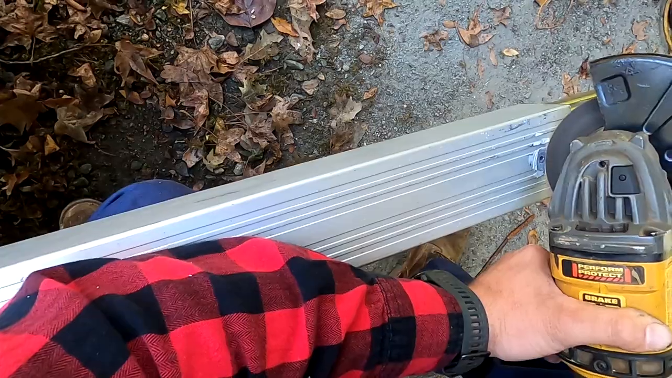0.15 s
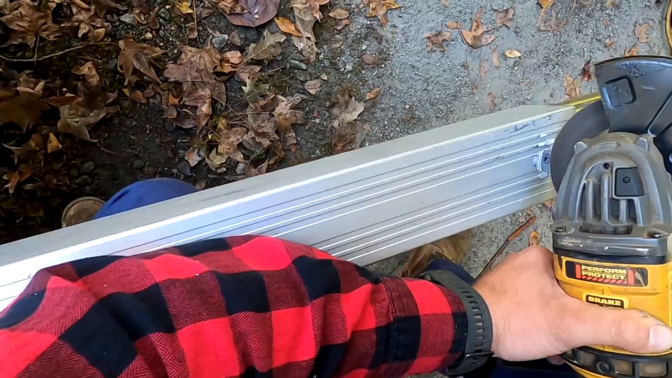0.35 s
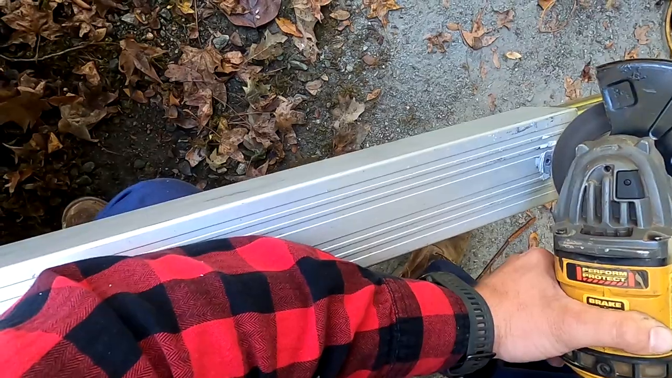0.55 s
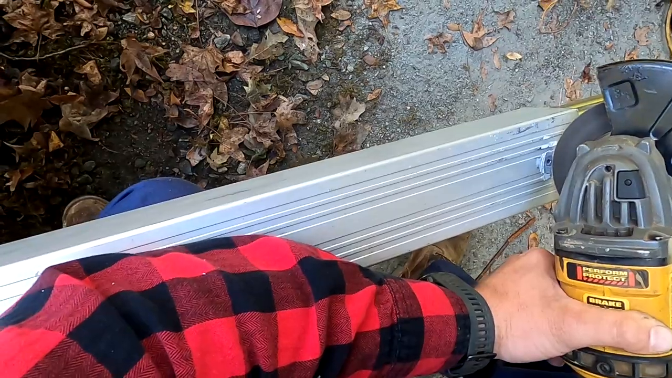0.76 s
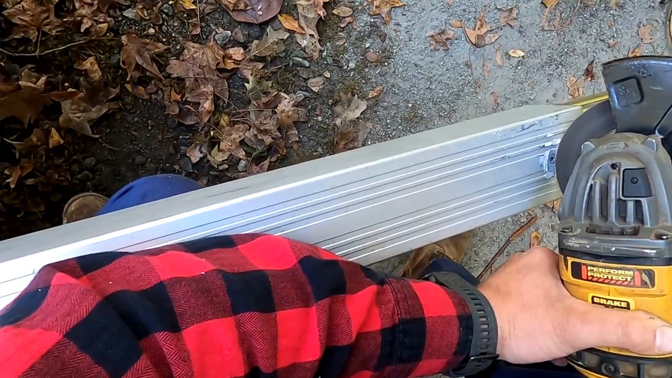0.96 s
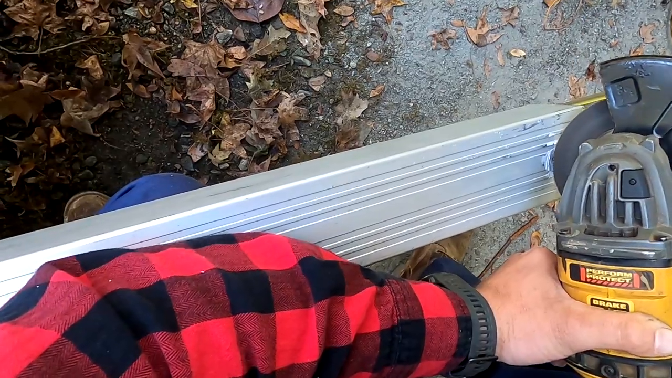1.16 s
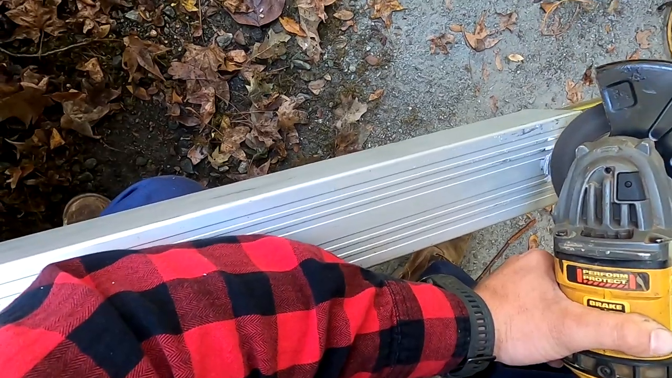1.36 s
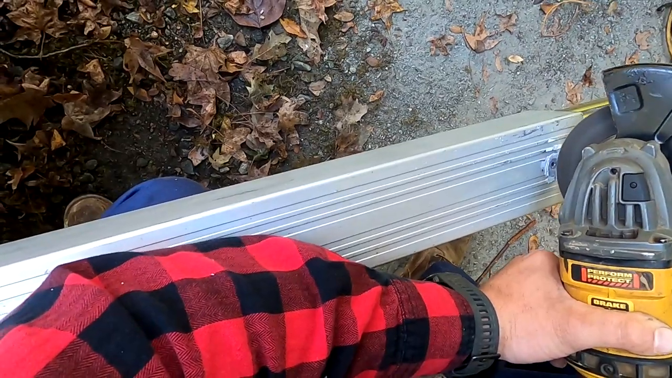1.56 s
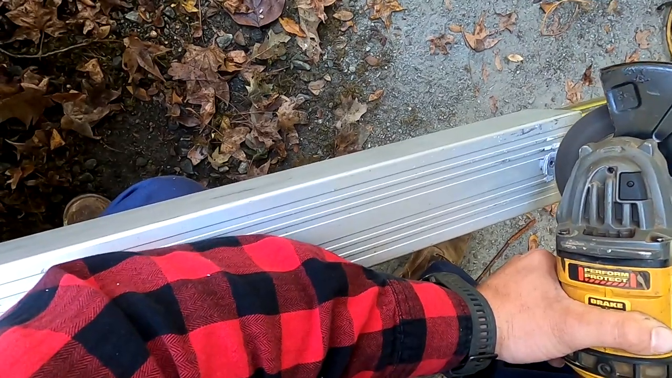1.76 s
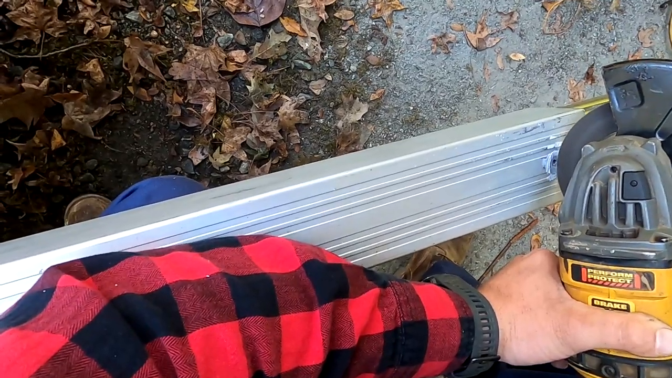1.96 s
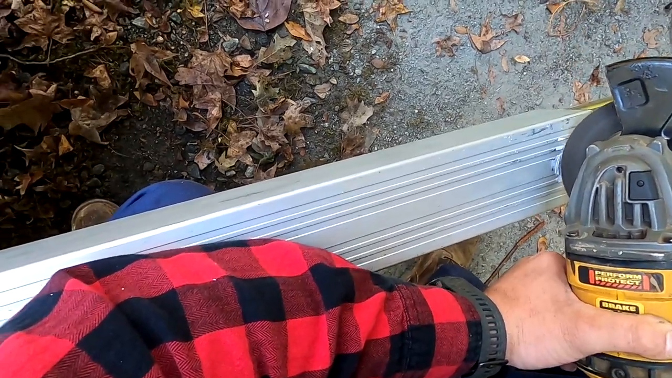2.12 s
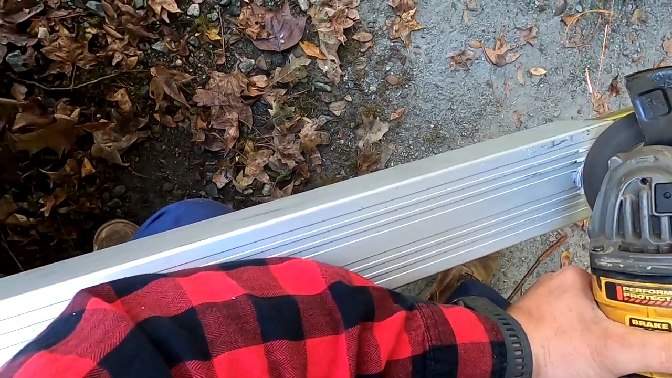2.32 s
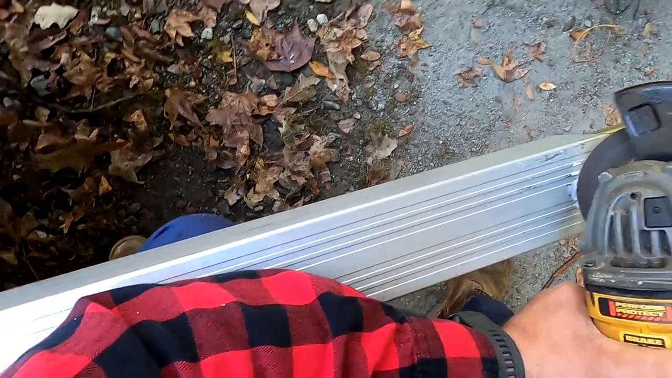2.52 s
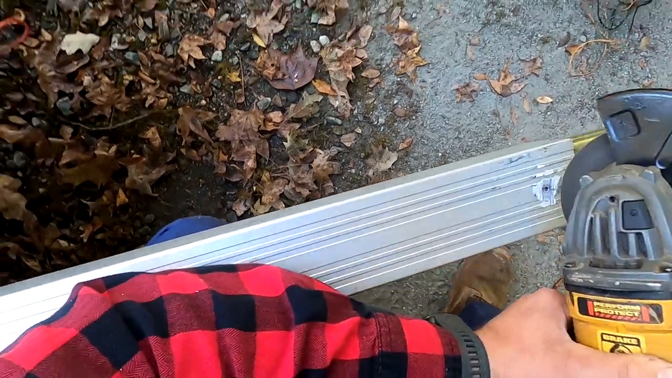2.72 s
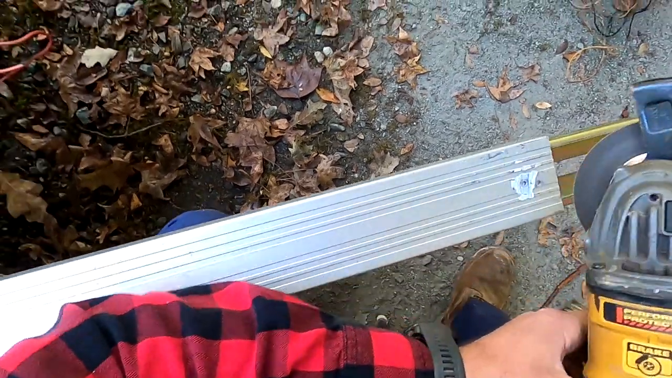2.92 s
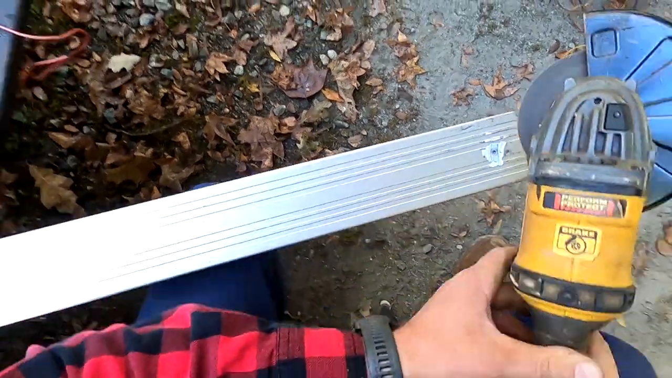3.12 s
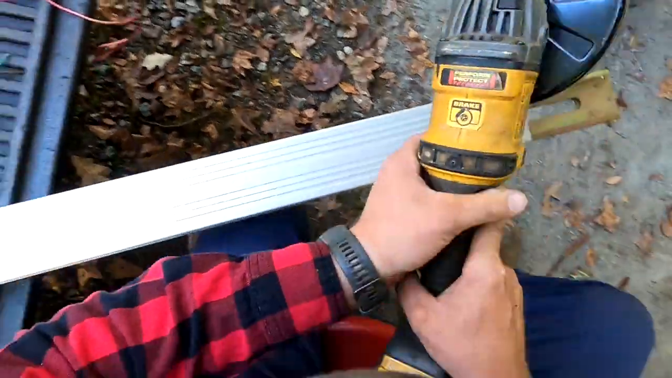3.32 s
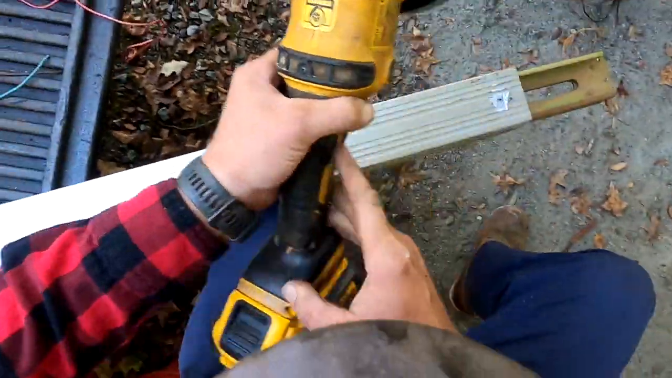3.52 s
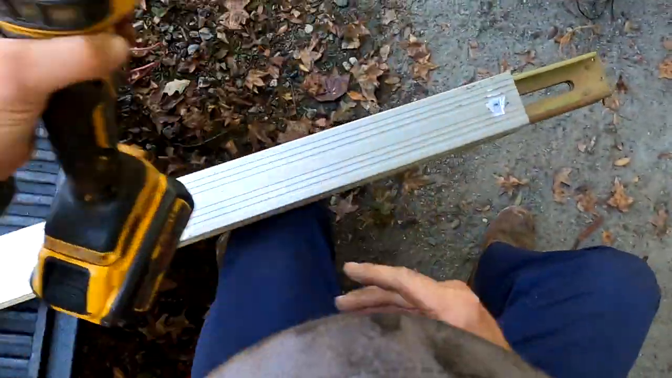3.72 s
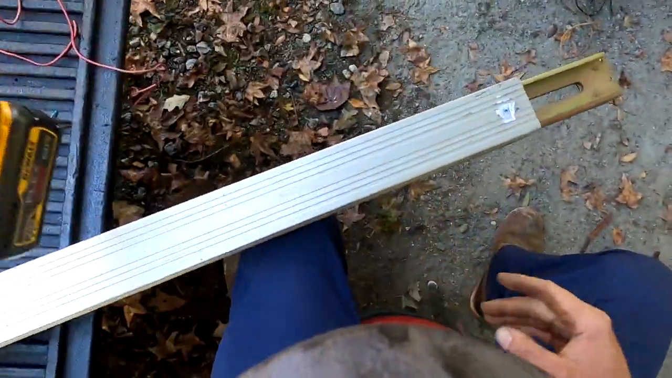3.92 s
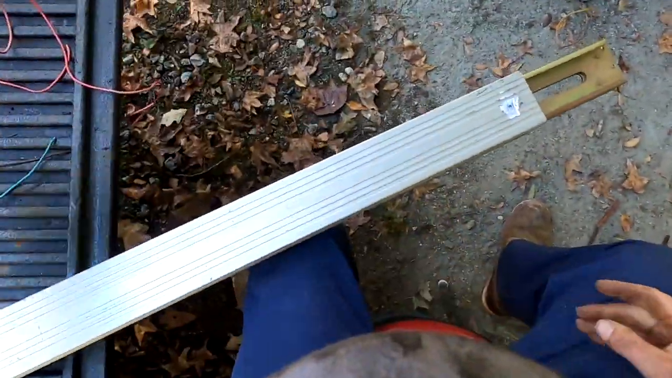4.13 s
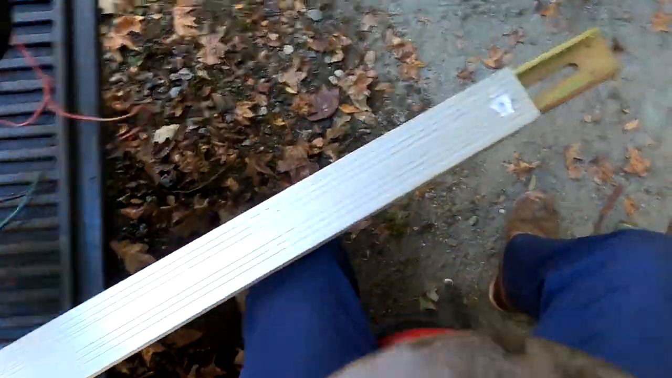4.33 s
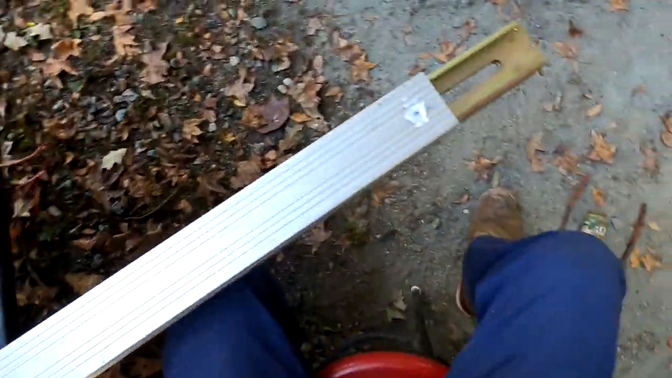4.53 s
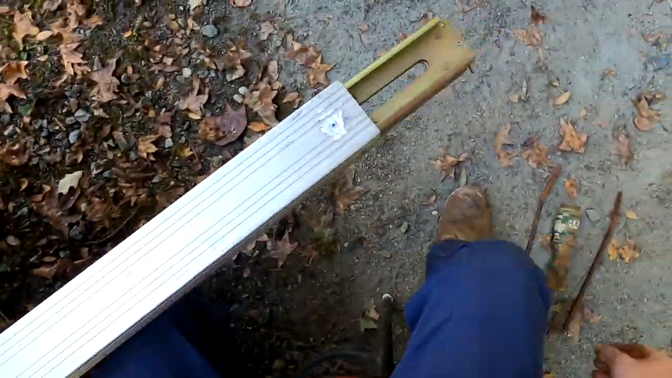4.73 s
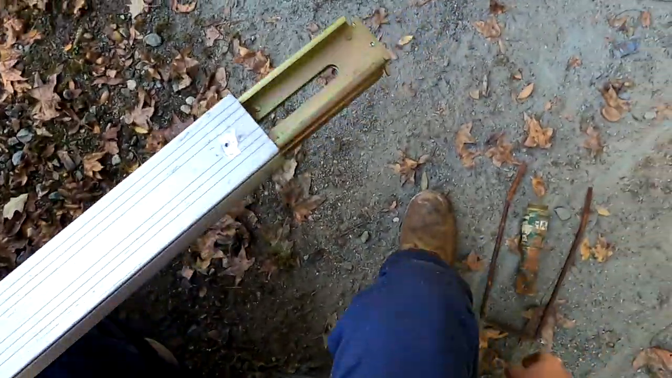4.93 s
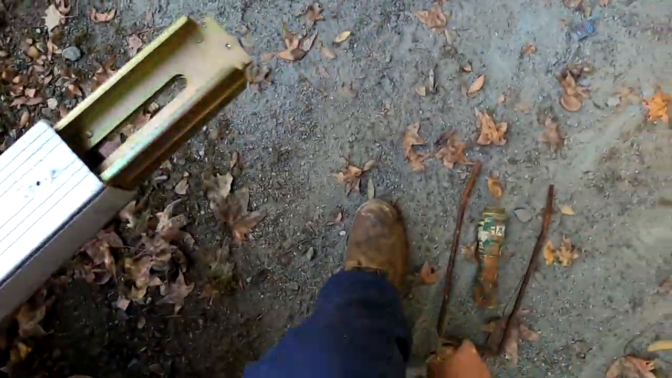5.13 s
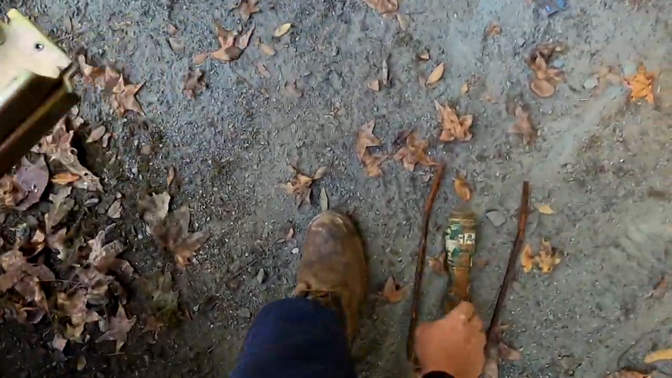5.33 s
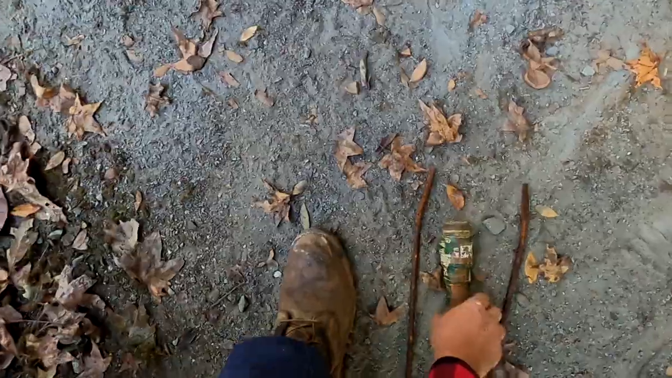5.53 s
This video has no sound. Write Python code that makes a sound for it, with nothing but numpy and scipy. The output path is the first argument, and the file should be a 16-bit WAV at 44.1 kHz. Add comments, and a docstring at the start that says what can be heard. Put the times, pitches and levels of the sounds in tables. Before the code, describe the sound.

A cordless angle grinder cuts steadily into metal right by the microphone, with a buzzing screech and gritty hiss. The tool then brakes, its whine sinking and its gears rattling to a few last clicks. The yard is briefly quiet before a hollow aluminium beam shifts in a burst of booming clanks and chatter. A faint squeak and a final ringing knock follow.

```python
"""Outdoors in a yard, close under a body-worn microphone, a cordless angle grinder grinds a rivet off
an aluminium beam: the disc's bumps drone and screech over a hiss of grit and sparks. At 2.6 s it lifts
off and brakes, motor whining and gears rattling, to its last tooth clicks at 3.75 s. A hush follows.
At 4.35 s the background noise steps up; then the hollow beam is heaved over a steel edge and booms,
clanks and rattles. A faint squeak comes at 5.2 s, then one more ringing knock."""
import sys
import numpy as np
from scipy import signal
from scipy.fft import rfft, irfft, next_fast_len
from scipy.io import wavfile
from scipy.ndimage import uniform_filter1d

SR = 44100
rng = np.random.default_rng(int(sys.argv[2]) if len(sys.argv) > 2 else 0)


def store_pcm(level_fs):
    """Save levels as 16-bit WAV."""
    pcm = np.round(np.clip(level_fs, -1, 1) * 32767).astype(np.int16)
    wavfile.write(sys.argv[1], SR, np.atleast_2d(pcm).T)


N = 250030
TIME = np.arange(N) / SR

# The two loudest tones: (time [s], beam drone at order 11 [dB], gear mesh at order 33 [dB])
DRONE_AND_MESH = [(0.0, -50, -34), (0.3, -42.5, -38), (0.58, -41, -35.5), (0.68, -36, -41),
                  (1.05, -36.5, -45.5), (1.16, -41.5, -46.5), (1.32, -41.5, -36), (1.4, -50, -40.5),
                  (1.51, -45, -44), (1.65, -37.5, -42), (1.95, -39.5, -41.5), (2.15, -39.5, -41.5),
                  (2.35, -35, -38), (2.45, -40.5, -36.5), (2.52, -36, -44.5), (2.58, -61.5, -61.5)]
# Bumps of the worn disc: (order [cycles per turn], usual level [dB])
DISC_BUMPS = [(1, -64), (2, -65), (4, -52), (6, -60.5), (7, -55), (9, -50.5), (14, -47.5), (17, -52.5),
              (23, -53.5), (26, -49.5), (31, -55), (36, -53), (41, -60.5), (50, -61), (60, -70.5),
              (74, -64.5), (90, -78.5)]
# Orders that stand apart, order: (level [dB], gain [dB per dB of bite])
STRONG_ORDERS = {3: (-55, 0), 5: (-53.5, 0), 8: (-48, .74), 10: (-45.5, .4), 12: (-54, 0), 13: (-43.5, .2),
                 16: (-47.5, 0.56), 20: (-46, 0),21: (-46, .26), 24: (-46, .8), 30: (-45.5, 0),
                 34: (-47.5, 0), 37: (-47.5, 0.44), 43: (-55.5, .5), 47: (-57, 1.2), 49: (-57, .6)}
# Orders that follow the drone, order: gain [dB per dB of drone]
DRONE_FOLLOWERS = {3: 0.83, 5: 1, 12: 1.3}
# Orders that sing out as the contact shifts, order: (time [s], half width [s], gain [dB])
CONTACT_SWELLS = {7: (0.27, 0.67, 9), 15: (0.29, .35, 4.2), 24: (1.5, 0.21, 2.3), 31: (1.3, 1, 4.9),
                  34: (1.37, 0.15, 6.9), 38: (0.66, .15, 10), 43: (1.3, .15, 6), 44: (0.42, 0.3, 9),
                  46: (2.2, .4, 7)}

def disc_tones(phase, bite_db, break_db):
    """The worn disc repeats its bumps every turn, sounding 90 harmonics (orders) of its speed."""
    end = round(2.63 * SR)
    drone_db, mesh_db = (curve[:end] for curve in curves(DRONE_AND_MESH))
    drone_swing = drone_db - drone_db.mean()
    drift = wobble(4.5, count=90, size=end)
    usual_db = np.interp(np.arange(91), *np.transpose(DISC_BUMPS)) + 1.5 * rng.standard_normal(91)
    tones = np.zeros(N)
    for order in range(1, 91):
        fine = order > 25  # finer bumps sharpen with a bite and wander more
        db, per_bite = STRONG_ORDERS.get(order, (usual_db[order], fine * 0.8 * order / 50))
        at, width, swell_db = CONTACT_SWELLS.get(order, (0, 1, 0))
        drift_db = 4.5 if fine and order not in STRONG_ORDERS else 2.2 * min(order / 8, 1)
        db += (fine * break_db + swell_db * bump(at, width) + per_bite * bite_db)[:end]
        db += DRONE_FOLLOWERS.get(order, 0) * drone_swing + drift_db * drift[order - 1]
        db = {11: drone_db, 33: mesh_db}.get(order, db)
        offset = 6 * rng.random() + 0.38 * drift[-order]
        tones[:end] += amp(db) * np.sqrt(2) * np.sin(order * phase[:end] + offset)
    return tones

# The disc sags where it bites and races as it lifts off: (time [s], speed [turns/s])
DISC_SPEED = [(0, 132.5), (.09, 132.9), (.33, 132.9), (.6, 132.4), (1, 132.05), (1.12, 131.45),
              (1.22, 131.85), (1.38, 132.35), (1.86, 132.2), (1.96, 131.75), (2.04, 132.25), (2.3, 132.2),
              (2.42, 130.8), (2.54, 134)]
# The disc bites harder: (time [s], half width [s], bite [dB])
DISC_BITES = [(.58, 0.066, 2), (1.14, 0.012, 4.5), (1.35, 0.25, 3), (1.44, 0.012, 5), (1.62, 0.0093, 4.5),
              (1.98, 0.051, 3.5)]
# Abrasive noise, heard close up: (frequency [Hz], relative level [dB])
GRIT_SPECTRUM = [(40, -44), (120, -26), (400, -13.5), (900, -6), (1300, -12), (2300, -4), (2900, -8.5),
                 (3400, -4.5), (4600, -8), (7500, -24), (11000, -74)]
# Hiss of the sparks, and later of the fan: (frequency [Hz], relative level [dB])
HISS_SPECTRUM = [(4000, -32), (5600, 0), (7900, -7), (10000, -7), (13000, -18.5), (15000, -50.5)]

def grinding():
    """Just below the microphone the disc cuts; grit and sparks throb with each turn over its tones."""
    bite_db = sum(db * bump(at, width) for at, width, db in DISC_BITES)
    break_db = -5 * bump(1.515, 0.02)  # the screech breaks off for a moment
    phase = phase_of(curves(DISC_SPEED)[0] + 0.1032 * wobble(16)[0])
    tones = disc_tones(phase, bite_db, break_db)
    throb = 1 + 0.2 * np.sin(phase) + 0.19 * np.sin(2 * phase + 1)
    grit = amp(break_db / 2 - 38) * coloured(throb * patchy(1.5), GRIT_SPECTRUM)
    spark_db = -47 - TIME + 1.3 * bite_db  # sinks 1 dB a second
    sparks = amp(spark_db) * coloured(throb * patchy(2.5) + 0.3 * unit(grains(2000, 4)), HISS_SPECTRUM)
    return (tones + grit + sparks) * gate(-1, 2.62, 0.038)

# The rattle with the disc side facing the microphone: (frequency [Hz], relative level [dB])
DISC_SIDE_SPECTRUM = [(60, -48.5), (400, -14.5), (1000, -8), (2400, -1.5), (3700, 2), (4500, 0),
                      (6800, -17), (13000, -62.5)]
# The rattle with the gear case facing it: (frequency [Hz], relative level [dB])
GEAR_CASE_SPECTRUM = [(80, -55), (440, -20.5), (1000, -14), (2200, -9), (2660, 4), (3100, -12.5),
                      (3900, -4.5), (4220, -4), (4600, -9), (5100, -11.5), (6300, -28), (13000, -49.5)]

def gear_rattle(motor_hz, braked_s):
    """Unloaded teeth knock, ever fewer as the disc slows; the level dips as the tool turns over."""
    knocks = 0.61 * unit(grains(8 * motor_hz + 800, 1.3)) + patchy(1.2)
    knocks *= amp(1.5 * braked_s * wobble(40)[0])  # slower means lumpier
    facing = gate(0, 3.08, 0.3)  # the disc side turns away
    disc_side = np.sqrt(facing) * coloured(knocks, DISC_SIDE_SPECTRUM)
    case_side = np.sqrt(1 - facing) * coloured(knocks, GEAR_CASE_SPECTRUM)
    return amp(-32 - 4.5 * bump(2.91, 0.14)) * (disc_side + case_side)

GEAR = 3.3  # motor turns per disc turn
# Motor tones: (multiple of motor speed, start [s], end [s], level at full speed [dB])
MOTOR_TONES = [(1 / GEAR, 2.53, 3.0, -65), (1, 2.55, 3.4, -58), (8, 2.96, 3.26, -36), (10, 3.05, 3.5, -35),
               (16, 3.24, 3.58, -36), (20, 3.02, 3.32, -37)]

def motor_whine(motor_hz):
    """The tones fall and soften as the motor slows; the disc's turn splits the upper ones."""
    phase = phase_of(motor_hz)
    whine = np.zeros(N)
    for multiple, start, end, db in MOTOR_TONES:
        level = amp(db) * motor_hz / motor_hz[0] * (0.9 + 0.3 * wobble(40)[0])
        flutter = 0.9 * wobble(70)[0] + (multiple > 1) * np.sin(phase / GEAR)
        whine += level * np.sin(multiple * phase + flutter) * gate(start, end, 0.1)
    return whine

def sinking_band():
    """A rough, narrow band sinks in pitch after lift-off."""
    hz = np.interp(TIME, [2.56, 3.03], [4120, 3480])
    return amp(-33) * np.sin(phase_of(hz)) * wobble(500)[0] * gate(2.56, 3.03, 0.07)

# The gears' final clicks: (time [s], relative level [dB])
TOOTH_CLICKS = [(3.737, -33), (3.7458, -25.5), (3.7546, -22.5)]

def last_teeth():
    """The last teeth click in the gear case, and the yard answers each faintly."""
    t = np.arange(SR // 8) / SR
    envelope = np.zeros(N)
    for at, db in TOOTH_CLICKS:
        add_at(envelope, at, decay(t, db, t60=0.012) + decay(t, db - 22, t60=0.12))
    return 1.2 * coloured(rng.standard_normal(N), GEAR_CASE_SPECTRUM, envelope)

LIFT_S, STOP_S, FREE_TURNS_PER_S, BRAKE_TURNS_PER_S2 = 2.58, 3.71, 132, 110.5

def braking():
    """Lifted off the beam, the grinder slows steadily: rattle, fan hiss and whine die away."""
    braked_s = np.maximum(TIME - LIFT_S, 0)
    motor_hz = GEAR * np.maximum(FREE_TURNS_PER_S - BRAKE_TURNS_PER_S2 * braked_s, 0)
    rattle = gear_rattle(motor_hz, braked_s)
    fan = amp(-46.5 - 20 * braked_s) * coloured(patchy(2.0), HISS_SPECTRUM)
    tool = (rattle + fan) * decay(TIME - STOP_S, 0, t60=0.25) + motor_whine(motor_hz) + sinking_band()
    tool = tool * gate(2.53, 3.9, 0.059) + last_teeth()
    treble = filtered(tool, lambda hz: hz ** 8 / (hz ** 8 + 3300 ** 8))
    dull_db = -25 * np.clip(TIME - 3.37, 0, 0.4)  # the slow rattle loses its top
    return tool - treble * (1 - amp(dull_db))

# Blows on the beam: (time [s], relative level [dB], thud offset [dB], ping [Hz])
BEAM_BLOWS = [(4.447, -30, -6, 806), (4.459, -5.5, -1.5, 4870), (4.477, -13.5, -4.5, 2550),
              (4.5247, -7, -2, 760), (4.547, -7.5, -6.5, 702), (4.565, -17.5, 3.5, 920),
              (4.643, -18, -13, 1970), (4.705, -16, -8, 1350), (4.723, -16.5, -7.5, 2350),
              (4.774, -32.5, 7, 1540), (4.861, -32.5, 4.5, 3400), (4.875, -36.5, 2.5, 1930),
              (4.928, -38, -3, 1840), (4.958, -41, 7.5, 2600), (5.018, -45.5, 17, 1010),
              (5.056, -42, 14.5, 1205), (5.422, -32, -6, 1400), (5.437, -33.5, 6, 3460)]

def clanks():
    """Each blow gives a crack envelope, a thud envelope and a ping lasting some ninety cycles."""
    t = np.arange(SR // 6) / SR
    crack, thud, pings = np.zeros((3, N))
    for at, db, thud_db, hz in BEAM_BLOWS:
        add_at(crack, at, decay(t, db - 2.5, t60=0.093) + decay(t, db, t60=0.0069))
        add_at(thud, at, decay(t, db + thud_db, t60=0.09))
        add_at(pings, at, decay(t, db - 11, t60=90 / hz) * np.sin(2 * np.pi * hz * t))
    return crack, thud, pings

# Low modes of the hollow beam: (frequency [Hz], width [Hz], gain [dB])
BEAM_MODES = [(141.8, 12, -2), (212, 19, 4), (356.4, 14, -5), (440, 4.3, -1.5), (560, 10.4, -14),
              (767, 120, -15), (865, 18, -10.5)]

def beam_response(hz):
    """The beam's resonances add to a direct path with alternating signs."""
    return 0.5 + sum((-1) ** k * amp(db) * 1j * hz * width / (centre ** 2 - hz ** 2 + 1j * hz * width)
                     for k, (centre, width, db) in enumerate(BEAM_MODES))

# First row: the background noise steps up and stays. Later rows: shoves along the edge.
# (start [s], boom drive [dB], chatter [dB], rise [s], hold [s], t60 [s])
STEP_AND_SHOVES = [(4.341, -55.5, -63.5, 0.014, 1.5, 1), (4.447, -15.5, -30, 0.012, 0.2, 0.47),
                   (4.842, -36.5, -75, 0.011, 0.0058, 0.82), (5.051, -35.5, -66, 0.025, 0.016, 0.32),
                   (5.161, -56, -57.5, 0.173, 0.092, 1), (5.411, -22.5, -34.5, 0.025, 0.038, 0.25),
                   (5.624, -45.5, -46.5, 0.048, .1, .3)]
# The shaking that drives the low modes: (frequency [Hz], relative level [dB])
BOOM_SPECTRUM = [(25, -50.5), (110, -15), (250, -8.5), (850, -11.5), (2000, -35), (4000, -71.5)]
# The loose steel end: (frequency [Hz], relative level [dB])
CHATTER_SPECTRUM = [(500, -19), (1000, -7.5), (2200, -10.5), (4500, -20.5), (7000, -33), (13000, -65.5)]

def beam():
    """Sliding and blows shake the hollow beam: its low modes boom, the loose steel end chatters."""
    shapes = [np.clip((TIME - at) / rise, 0, 1) ** 3 * decay(TIME - at - rise - hold, 0, t60)
              for at, _, _, rise, hold, t60 in STEP_AND_SHOVES]
    boom_level, chatter_level = amp(np.transpose(STEP_AND_SHOVES)[1:3]) @ shapes
    crack, thud, pings = clanks()
    shaking = patchy(1) + 0.3 * unit(grains(300, 2))
    boom = filtered(coloured(shaking, BOOM_SPECTRUM, boom_level + amp(-3) * thud), beam_response)
    rattling = patchy(4.3) + 0.34 * unit(grains(650, 1.2))
    chatter = coloured(rattling, CHATTER_SPECTRUM, chatter_level + amp(-12.5) * crack)
    return boom + chatter + pings

# The beam's ring after the last knock: (frequency [Hz], level [dB], t60 [s])
KNOCK_MODES = [(147.8, -26, 0.52), (241, -19.5, 0.31), (900, -24, 0.34), (2100, -15, 0.084),
               (3714, -41, 0.28)]

def last_knock():
    """Knocked once more, the beam swells quickly into a ring."""
    t = np.arange(round(0.3 * SR)) / SR
    modes = sum(decay(t, db, t60) * np.sin(2 * np.pi * hz * t) for hz, db, t60 in KNOCK_MODES)
    ring = np.zeros(N)
    add_at(ring, 5.44, modes * (1 - np.exp(-t / 0.028)))
    return ring

# A thin, high squeak: (time [s], frequency [Hz], level [dB])
SQUEAK_PATH = [(5.22, 3960, -66), (5.35, 3990, -72)]

def squeak():
    """A faint, slightly rough whistle just before the last knock."""
    hz, db = curves(SQUEAK_PATH)
    return amp(db + 4.1 * wobble(80)[0]) * np.sqrt(2) * np.sin(phase_of(hz)) * gate(5.21, 5.35, 0.012)

# Open air around the microphone: (frequency [Hz], relative level [dB])
YARD_SPECTRUM = [(40, -24), (170, 5), (300, -6.5), (482, 4.5), (620, -22.5), (860, -1.5), (1460, -10.5),
                 (3300, -18), (7000, -22), (12000, -44.5)]

def yard():
    """The low hush of the yard, heard once the tool stops."""
    return amp(-74.5) * coloured(patchy(2.6), YARD_SPECTRUM)

def amp(db):
    return 10 ** (np.asarray(db) / 20)

def unit(x):
    return x / np.sqrt(np.mean(x ** 2) + 1e-20)

def decay(t, db, t60):
    """Holds db until t = 0, then falls 60 dB every t60 seconds."""
    return amp(db - 60 * np.maximum(t, 0) / t60)

def bump(at, width):
    return np.exp(-((TIME - at) / width) ** 2)

def gate(start, end, fade):
    """1 between two times, with soft ends."""
    return np.clip(np.minimum(TIME - start, end - TIME) / fade, 0, 1)

def phase_of(hz):
    return 2 * np.pi * np.cumsum(hz) / SR

def add_at(track, start_s, sound):
    span = track[round(start_s * SR):][:len(sound)]
    span += sound[:len(span)]

def curves(rows):
    """One value per sample for each column after the time."""
    times, *columns = np.transpose(rows)
    return [np.interp(TIME, times, column) for column in columns]

def wobble(rate, count=1, size=N):
    """Random curves, rate knots a second."""
    knots = rng.standard_normal((count, int(size * rate / SR) + 2))
    return [np.interp(np.arange(size) * rate / SR, np.arange(len(k)), k) for k in knots]

def along(points):
    """Gain against frequency from (Hz, dB) points."""
    f, db = np.transpose(points)
    return lambda hz: amp(np.interp(np.log(hz + 1), np.log(f + 1), db))

def filtered(x, response):
    """x times a response of frequency."""
    size = next_fast_len(N + SR // 2)
    return irfft(rfft(x, size) * response(np.fft.rfftfreq(size, 1 / SR)), size)[..., :N]

def coloured(x, points, envelope=1):
    """x under an envelope, through a spectrum that brings x itself to rms 1."""
    plain, shaped = filtered(np.array([x, x * envelope]), along(points))
    return shaped / np.std(plain)

def patchy(depth_db):
    """White noise with patches of random gain."""
    spectra = signal.stft(rng.standard_normal(N), nperseg=512)[2]
    patches = uniform_filter1d(uniform_filter1d(rng.standard_normal(spectra.shape), 8, 0), 12, 1)
    return signal.istft(spectra * amp(depth_db * unit(patches)), nperseg=512)[1][:N]

def grains(per_s, spread_db):
    """Random clicks of uneven size."""
    return (rng.random(N) < per_s / SR) * rng.standard_normal(N) * amp(spread_db * rng.standard_normal(N))

def scene():
    """Grinder, beam and yard reach both channels alike."""
    mono = yard() + grinding() + braking() + beam() + last_knock() + squeak()
    return np.array([mono, mono])

# Scatter between the channels: (frequency [Hz], side against middle [dB])
SIDE_SPECTRUM = [(100, -50), (3000, -35), (9000, -27), (12500, 1)]

def record(dry):
    """Nearly mono sound, with scatter between the channels in the top treble; nothing above 15 kHz."""
    freqs, _, spectra = signal.stft(dry[0], SR, nperseg=256)
    scatter = np.exp(2j * np.pi * rng.random(spectra.shape))
    side = signal.istft(spectra * along(SIDE_SPECTRUM)(freqs)[:, None] * scatter, SR, nperseg=256)[1][:N]
    return filtered(dry + [side, -side], lambda hz: hz < 15000)

dry = scene()
out = record(dry)
store_pcm(out)
```